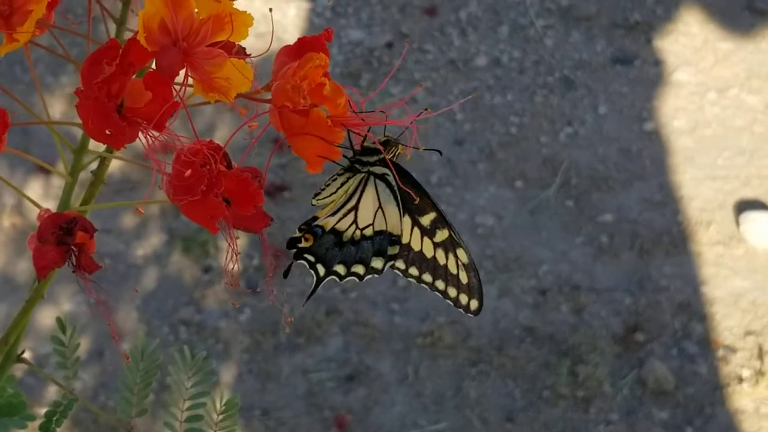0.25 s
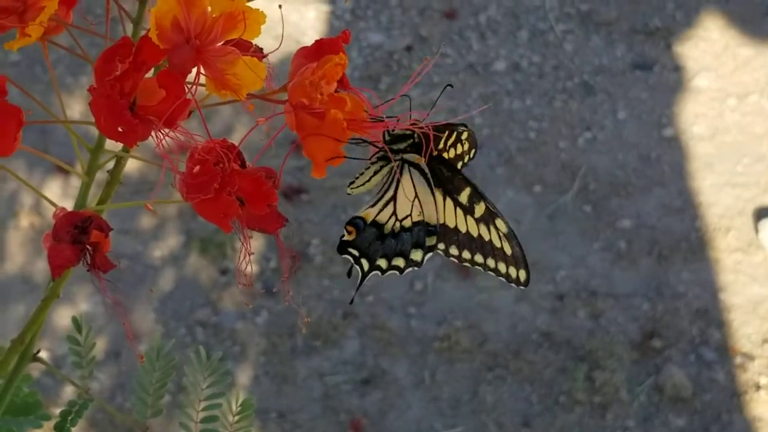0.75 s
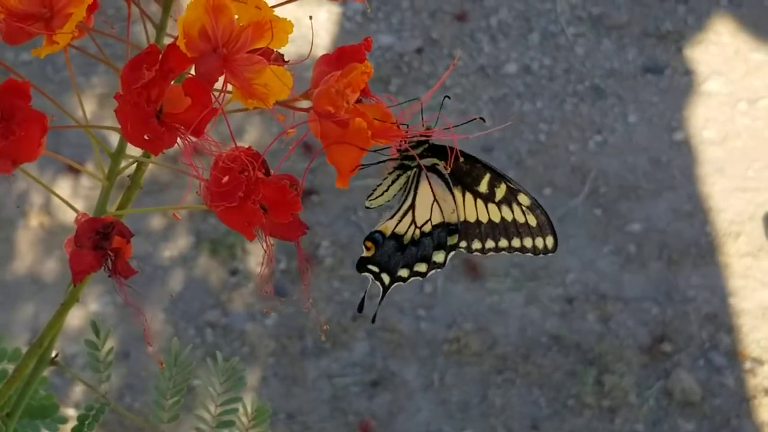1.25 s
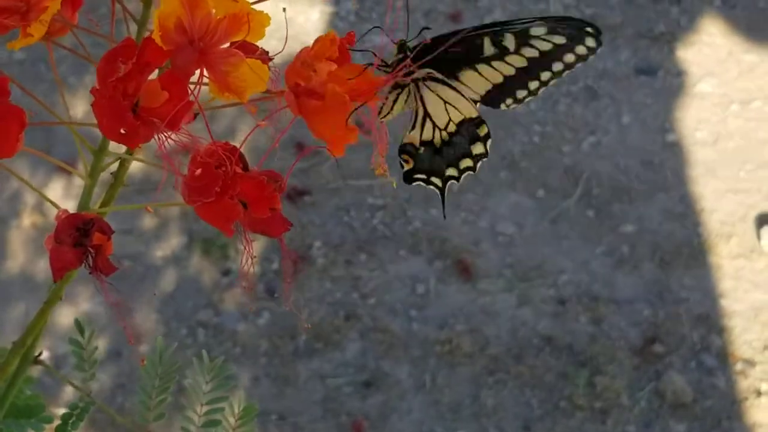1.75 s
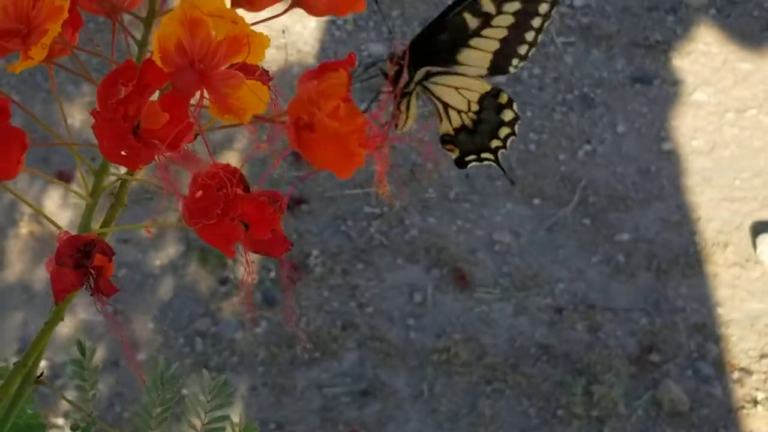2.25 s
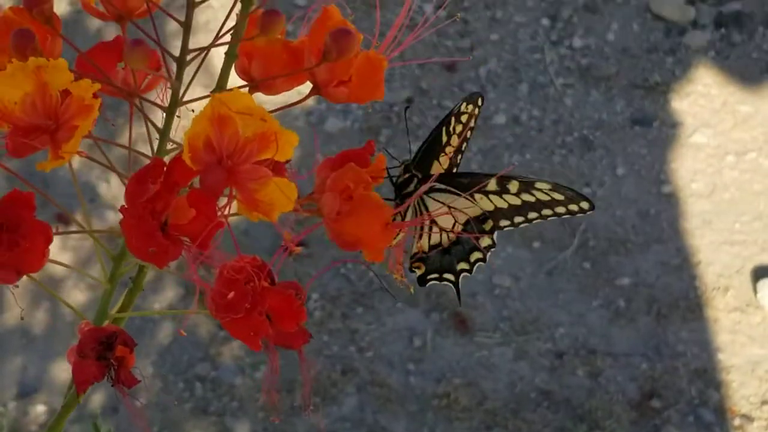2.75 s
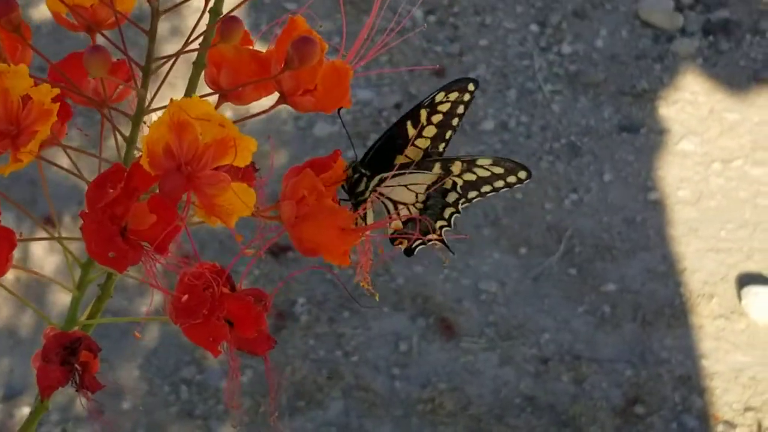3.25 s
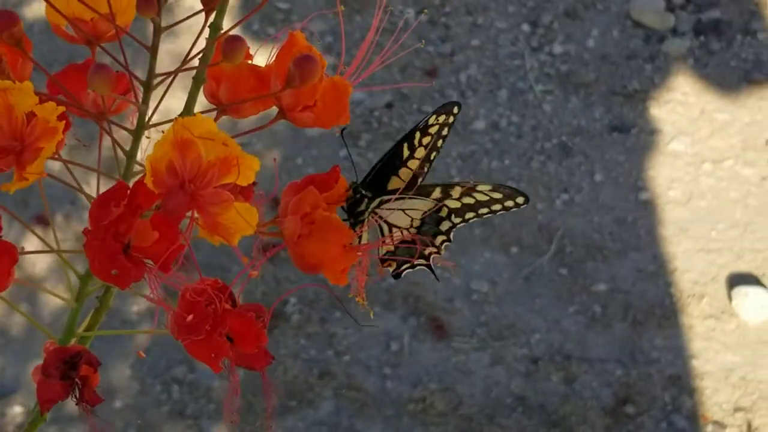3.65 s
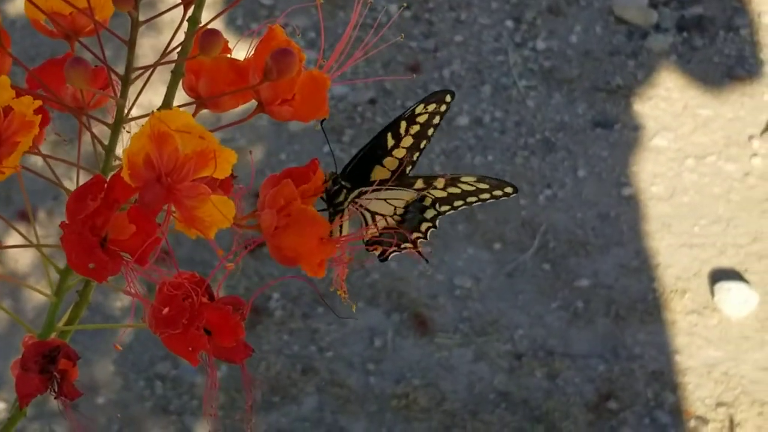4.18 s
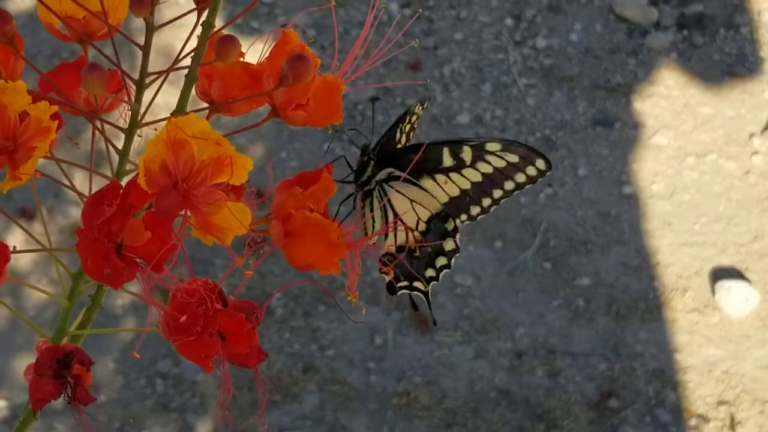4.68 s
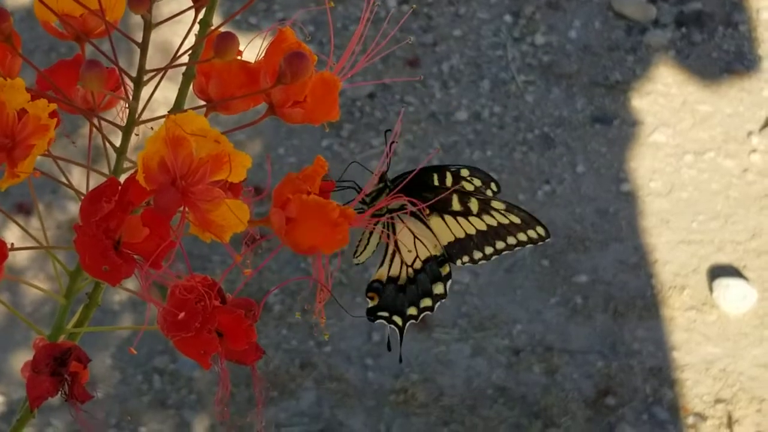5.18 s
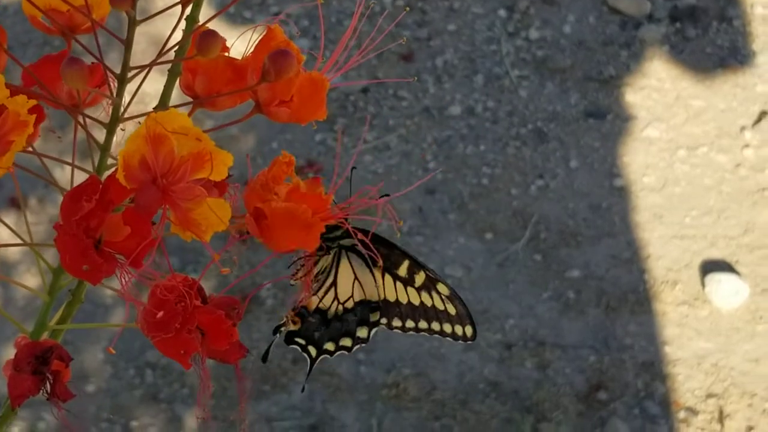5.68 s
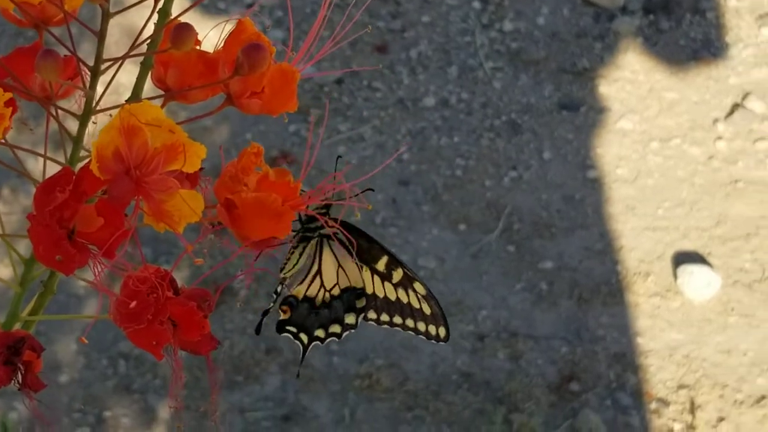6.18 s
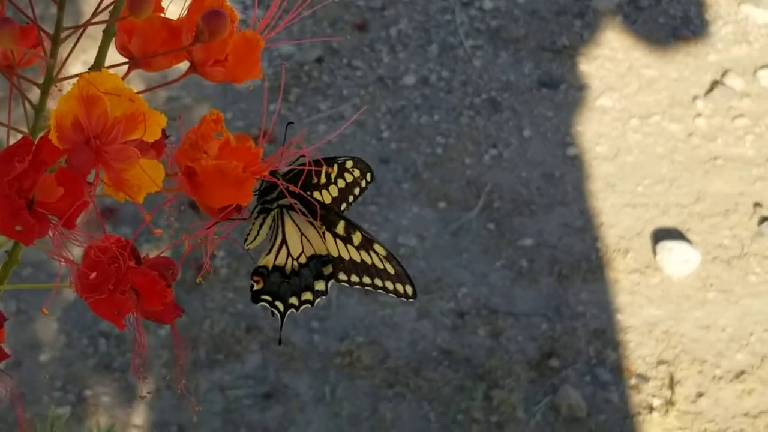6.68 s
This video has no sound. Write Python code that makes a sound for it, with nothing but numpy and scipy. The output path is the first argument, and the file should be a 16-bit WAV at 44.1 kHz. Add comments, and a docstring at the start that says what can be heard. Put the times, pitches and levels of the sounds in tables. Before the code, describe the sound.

A quiet outdoor spot near a road, heard in stereo with faint microphone hiss leaning left. From 0 s a distant multi-cylinder engine is pulling away: a deep, rounded drone around 130 Hz, rising slightly in pitch until about 1 s, pulsing and booming strongest near 1.3 s, then dropping off by 1.6 s. At 1.7 s it has shifted up, now lower and much fainter, climbing slowly until about 5 s and fading away before 7 s. Beneath lie soft low traffic rumble, thickening slightly, and faint steady hums near 250 and 200 Hz. Tyre roar, barely there at first, swells slightly around 2 s and keeps rising ever faster to the end, with a blurry tread whine. Small dull pops come from about 2.1 s to 6.4 s, riding the roar. Tiny dry ticks snap at about 0.9, 1.6 to 1.8, 3.7 and 6.8 s.

```python
"""Distant engine pulling away near a road

An eight-cylinder engine pulls, booms, shifts up and pulls on: swept multiples of its cycle through pipe resonances.
Far traffic, nearing tyre roar and the town's wash are shaped noise; hums and tread whine are narrow noise.
Faint pops are struck ringing modes, a few close ticks are band noise bursts; two microphone ports hiss."""
import sys
import numpy as np
from scipy import signal
from scipy.io import wavfile
from scipy.ndimage import uniform_filter1d

SR = 44100
rng = np.random.default_rng(int(sys.argv[2]) if len(sys.argv) > 2 else 0)


def materialize(psi):
    """Save the field psi as 16-bit PCM at rate SR to the path in sys.argv[1].

    A 1-D psi becomes a single channel; in a 2-D psi each row is a channel.
    """
    bounded = np.clip(np.atleast_2d(psi).T, -1, 1)
    quanta = np.round(bounded * 32767).astype(np.int16)
    wavfile.write(sys.argv[1], SR, quanta)


N = 305613

# Microphone ports. Each row: frequency in Hz, likeness of road sound 0-1, lead of the left in radians.
PORTS = [(35, .88, -.1), (130, .985, .05), (350, .96, .3), (560, .85, 1.1), (780, .86, .7), (1030, .6, 2.4),
         (1550, .68, 2.1), (2150, .4, 5.6), (3000, .3, 7.3), (4300, .2, 10.5)]
# Port balance. Each row: frequency in Hz, left over right in dB.
LEFT_OVER_RIGHT_DB = [(270, 6), (430, 4.5), (620, 8.5), (900, 4), (1050, 4), (1250, 11), (1400, 13.5),
                      (1800, 7), (2200, 13), (3650, 6), (4300, 11.5), (6400, 6), (9100, 3), (15000, 2)]

# Engine gears. Each row: start in s, time of top speed in s, end in s, cycles per s at start, top and end,
# offset of the uneven-cylinder tones in dB at start, top and end.
GEARS = [(0, .95, 1.6, 15.45, 16.85, 15.8, -53, -52, -51.5),
         (1.7, 5.2, 6.93, 11.75, 14.1, 13.7, -54, -50, -61.5)]
# Firing tone, one curve a gear. Each row: time in s, amplitude before port balance and end fades in dB.
BOOM = [
    [(0, -43), (.07, -36), (.74, -30.5), (.775, -34), (1.01, -31.5), (1.075, -34), (1.13, -29),
     (1.18, -31.5), (1.315, -26), (1.38, -29.5), (1.42, -36.5), (1.5, -40), (1.58, -63)],
    [(2.3, -62), (3.1, -47.5), (5.5, -49), (6.3, -70)],
]
# Uneven-cylinder tones: multiples of the cycle rate, no unit.
MULTIPLES = [4, 9, 10, 11, 12, 15, 16, 17, 18, 19, 20, 21, 22]
# Relative strength of each multiple in dB.
MULTIPLE_DB = [-8., -13., -2., -4., -13., -11., -7., -4., -11., -5., -8., -8., -7.]
# Exhaust resonances. Each row: frequency in Hz, width in Hz, peak in dB.
PIPE = [(132, 18, 10.), (253, 16, 8.), (284, 26, 8.)]
FIRINGS_PER_CYCLE = 8
EASE_POWER = 1.4  # speed nears and leaves its top by this power of time

# Town hums. Each row: frequency in Hz, one-pole width in Hz, rms of the port mean in dB.
HUMS = [(250.8, 4.8, -59.), (201.6, 16, -66), (56, 14, -53)]

# Far traffic spectrum. Each row: frequency in Hz, relative density in dB per Hz.
RUMBLE = [(15, -45), (30, -24), (46, -6.5), (60, 1.5), (105, 5), (135, 2), (170, -1.5), (225, -2.5),
          (280, -2.5), (330, -11), (390, -7), (480, -14.5), (780, -26), (1000, -47.5), (1500, -71.5)]
RUMBLE_START_DB, RUMBLE_DB_PER_S = -46, 0.4732

# Tyre spectrum. Each row: frequency in Hz, relative density in dB per Hz.
ROAR = [(180, -28), (300, -2), (322, 8.5), (453, -21.5), (587, -3.5), (717, -6.5), (788, -5), (1020, -9.5),
        (1420, -14), (1900, -27.5), (2590, -36), (3510, -42), (4140, -35), (5000, -55), (6500, -82.5),
        (11000, -120)]
# Tread resonance, one row: frequency in Hz, one-pole width in Hz, rms relative to the roar noise in dB.
WHINE = (778, 65, -10.)
# Early swell of the roar, one row: centre in s, half width in s (to 1/e of the dB), rise in dB.
ROAR_SWELL = (2.04, .7, 3.5)
ROAR_START_DB, ROAR_DB_PER_S, ROAR_DB_PER_S2 = -70, 1.8866, 0.1551

# Town wash and hiss spectrum. Each row: frequency in Hz, relative density in dB per Hz.
WASH = [(410, -32.5), (700, -2.5), (968, -22.5), (1050, -16), (1650, -6.5), (2080, -9), (2310, -13),
        (2660, -8.5), (3880, -19.5), (4360, -16.5), (4900, -18), (7810, -31), (9620, -25.5), (12500, -11),
        (15500, -13)]
WASH_DB = -71.5

# Road pops. Each row: time in s, blow level before mode gains in dB, extra on the top mode in dB.
POPS = [(2.121, -48, -7), (3.067, -44.5, -15), (3.26, -40, -8), (3.387, -44.5, -12), (3.889, -46, -16),
        (4.253, -45, -7), (4.549, -43, -4), (4.741, -59, -14), (5.03, -39.5, -22), (5.788, -43, -19),
        (6.391, -39, -17)]
# Pop modes. Each row: frequency in Hz, gain in dB, t60 in s.
POP_RING = [(420, 2., .014), (770, 0., .022), (1350, 4., .012)]

# Ticks. Each row: time in s, peak before pan in dB, left over right in dB, low edge in Hz, high edge in Hz,
# t60 of the noise envelope in s.
TICKS = [(0.949, -60, -7, 12000, 15700, 0.0077), (1.5928, -58, 0, 12000, 15600, .007),
         (1.7364, -53, 12, 12000, 15600, .007), (1.7794, -57, 4.5, 12000, 15600, .007),
         (3.7393, -64, -9, 12000, 15600, .007), (6.81, -63, 20, 2500, 4720, .02)]

EDGE_HZ, FADE_S = 15700, .004


def gain_of(db):
    """Decibels to an amplitude factor."""
    return 10 ** (np.asarray(db) / 20)


def evened(x):
    """Scales to rms 1."""
    return x / np.sqrt(np.mean(x ** 2) + 1e-20)


def read(points, hz, axis=1):
    """Interpolates a table column on a log-frequency axis."""
    columns = np.transpose(points)
    return np.interp(np.log(hz + 1), np.log(columns[0] + 1), columns[axis])


def drift(t, fastest_hz, count=24):
    """Slow random curve of rms 1: sines of random phase, weaker when faster."""
    hz = np.geomspace(fastest_hz / 8, fastest_hz, count)
    return evened(sum(np.sin(2 * np.pi * (f * t + rng.random())) / np.sqrt(f) for f in hz))


def through_ports(x, hz):
    """Level and phase differences of a narrow complex sound at the two ports."""
    lead_rad = read(PORTS, hz, axis=2)
    lean = gain_of(read(LEFT_OVER_RIGHT_DB, hz) / 2)
    return np.array([lean * x.real, (x * np.exp(-1j * lead_rad)).real / lean])


def noise(spectrum, patchy_db, flicker_db, likeness, size=2048):
    """Random short-time spectra with drifting patches, partly alike at both ports; port mean of rms 1."""
    hop = size // 4
    frames, hz = N // hop + 5, np.fft.rfftfreq(size, 1 / SR)
    a, b, c, d, patches = rng.standard_normal((frames, len(hz), 5)).T
    patches = uniform_filter1d(patches, size=size // 100, axis=0)  # across frequency
    patches = evened(uniform_filter1d(patches, size=5, axis=1))  # across time
    flicker = drift(np.arange(frames) * hop / SR, 15)

    same = np.clip(likeness * read(PORTS, hz), 0, 1)[:, None]
    lag = np.exp(-1j * read(PORTS, hz, axis=2))[:, None]
    left = a + 1j * b
    right = same * left * lag + np.sqrt(1 - same ** 2) * (c + 1j * d)
    lean = gain_of(read(LEFT_OVER_RIGHT_DB, hz) / 2)[:, None]

    level_db = read(spectrum, hz)[:, None] + patchy_db * patches + flicker_db * flicker
    spectra = np.array([left * lean, right / lean]) * gain_of(level_db)
    out = signal.istft(spectra, nperseg=size, noverlap=size - hop)[1][:, :N]
    return out / np.sqrt(np.mean(out.mean(0) ** 2))


def fuzzy_tone(hz, width_hz, db):
    """Slow complex noise shifted up to a pitch: a tone that wavers and breaks."""
    slow = rng.standard_normal(N) + 1j * rng.standard_normal(N)
    r = np.exp(-np.pi * width_hz / SR)
    for _ in range(2):
        slow = signal.lfilter([1 - r], [1, -r], slow)
    carrier = np.exp(2j * np.pi * hz * np.arange(N) / SR)
    tone = through_ports(slow * carrier, hz)
    return gain_of(db) * tone / np.sqrt(np.mean(tone.mean(0) ** 2))


def pipe_gain(hz):
    """Exhaust resonances add in power over a floor below 320 Hz."""
    power = 0.21 * (hz < 320)
    for f, width_hz, peak_db in PIPE:
        power = power + gain_of(peak_db) ** 2 / (1 + (2 * (hz - f) / width_hz) ** 2) ** 2
    return np.sqrt(power)


def engine(gear, boom, waver_db, slip_rad, fade_s=0.11):
    """Cycle multiples sweep through the pipe; echoes along the road, as random drift, waver and slip them."""
    s0, top_s, s1, start_hz, top_hz, end_hz, *uneven_db = gear
    start = max(round((s0 - fade_s) * SR), 0)
    t = np.arange(start, min(round((s1 + fade_s) * SR), N)) / SR
    coarse = t[::256]

    before = np.maximum(top_s - t, 0) / (top_s - s0)
    after = np.maximum(t - top_s, 0) / (s1 - top_s)
    cycle_hz = top_hz - (top_hz - start_hz) * before ** EASE_POWER - (top_hz - end_hz) * after ** EASE_POWER
    turns = np.cumsum(cycle_hz) / SR
    running = np.interp(t, [s0 - fade_s, s0, s1, s1 + fade_s], [0, 1, 1, 0])

    def heard(multiple, level, wander_rad):
        """One multiple of the cycle through both ports."""
        phase = 2 * np.pi * (multiple * turns + rng.random()) + np.interp(t, coarse, wander_rad)
        return np.interp(t, coarse, level) * through_ports(np.exp(1j * phase), multiple * cycle_hz.mean())

    boom_level = gain_of(np.interp(coarse, *np.transpose(boom)))
    tones = heard(FIRINGS_PER_CYCLE, boom_level, slip_rad * drift(coarse, 5.1))
    for multiple, db in zip(MULTIPLES, MULTIPLE_DB):
        pipe = pipe_gain(multiple * cycle_hz[::256])
        level_db = db + np.interp(coarse, [s0, top_s, s1], uneven_db) + waver_db * drift(coarse, 8)
        tones += heard(multiple, pipe * gain_of(level_db), 2 * slip_rad * drift(coarse, 6))
    return np.pad(tones * running, ((0, 0), (start, N - start - len(t))))


def town_hums():
    """Steady fuzzy tones: narrow noise at fixed pitches."""
    return sum(fuzzy_tone(*row) for row in HUMS)


def far_traffic():
    """Low shaped noise that slowly thickens."""
    t = np.arange(N) / SR
    rumble = noise(RUMBLE, patchy_db=0.38, flicker_db=0.15, likeness=1.0, size=4096)
    return gain_of(RUMBLE_START_DB + RUMBLE_DB_PER_S * t) * rumble


def nearing():
    """Gain of the tyre roar: a quickening rise in dB with one broad swell."""
    t = np.arange(N) / SR
    centre_s, half_width_s, swell_db = ROAR_SWELL
    swell = swell_db * np.exp(-((t - centre_s) / half_width_s) ** 2)
    return gain_of(ROAR_START_DB + ROAR_DB_PER_S * t + ROAR_DB_PER_S2 * t ** 2 + swell)


def tyres():
    """Patchy roar and a narrow tread resonance grow together."""
    roar = noise(ROAR, patchy_db=1.73, flicker_db=.5, likeness=0.85, size=1024)
    return nearing() * (roar + fuzzy_tone(*WHINE))


def town_wash():
    """Town wash and port hiss: steady noise, little alike at the two ports."""
    return gain_of(WASH_DB) * noise(WASH, patchy_db=1.5, flicker_db=0.3, likeness=0.27, size=1024)


def pops(small_per_s, small_db, small_bright_db):
    """Each blow rings short decaying modes; many small ones ride on the tyre roar."""
    t = np.arange(2000) / SR
    soft_start = np.sin(np.pi / 2 * np.minimum(t / .0018, 1)) ** 2
    struck = rng.random(N) < small_per_s / SR
    spread_db = 2.4 * np.minimum(rng.exponential(1, N), 3)
    small = struck * gain_of(small_db + spread_db) * nearing()

    out = np.zeros((2, N))
    for hz, db, t60_s in POP_RING:
        top = hz > 1000
        blows = small * rng.uniform(-1.5, 1, N) * gain_of(top * small_bright_db)
        for s, blow_db, bright_db in POPS:
            blows[round(s * SR)] = gain_of(blow_db + top * bright_db)
        ring = -1j * gain_of(db - 60 * t / t60_s) * np.exp(2j * np.pi * hz * t) * soft_start
        out += through_ports(signal.oaconvolve(blows, ring)[:N], hz)
    return out


def ticks():
    """Tiny dry snaps: decaying noise through a band filter."""
    size = 400
    out, t = np.zeros((2, N + size)), np.arange(size) / SR
    for s, db, pan_db, low_hz, high_hz, t60_s in TICKS:
        band = signal.butter(4, [low_hz, high_hz], "bandpass", fs=SR, output="sos")
        burst = signal.sosfilt(band, rng.standard_normal((2, size)) * gain_of(-60 * t / t60_s))
        burst /= abs(burst).max(axis=1, keepdims=True)
        out[:, round(s * SR):][:, :size] += gain_of(db) * burst * gain_of([[pan_db / 2], [-pan_db / 2]])
    return out[:, :N]


def scene():
    """Sums the two engine gears and all surroundings."""
    low_gear = engine(GEARS[0], BOOM[0], waver_db=2., slip_rad=.1)
    high_gear = engine(GEARS[1], BOOM[1], waver_db=2.5, slip_rad=.15)
    town = town_hums() + town_wash()
    road = far_traffic() + tyres() + pops(small_per_s=27, small_db=-5.5, small_bright_db=-10.5)
    return low_gear + high_gear + town + road + ticks()


def record(dry):
    """Very short fades at both ends, then a linear-phase low-pass as the recorder's band limit."""
    t = np.arange(N) / SR
    faded = dry * np.minimum(np.minimum(t, t[::-1]) / FADE_S, 1)
    low_pass = signal.firwin(511, EDGE_HZ, window=("kaiser", 9), fs=SR)
    return signal.oaconvolve(faded, low_pass[None], "same")


dry = scene()
out = record(dry)
materialize(out)
```